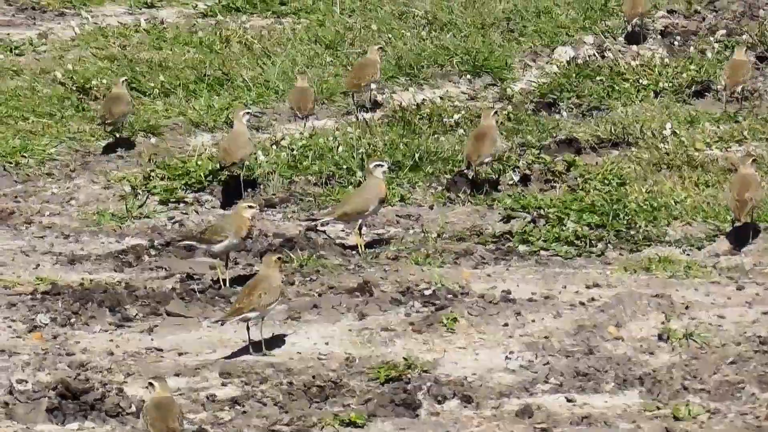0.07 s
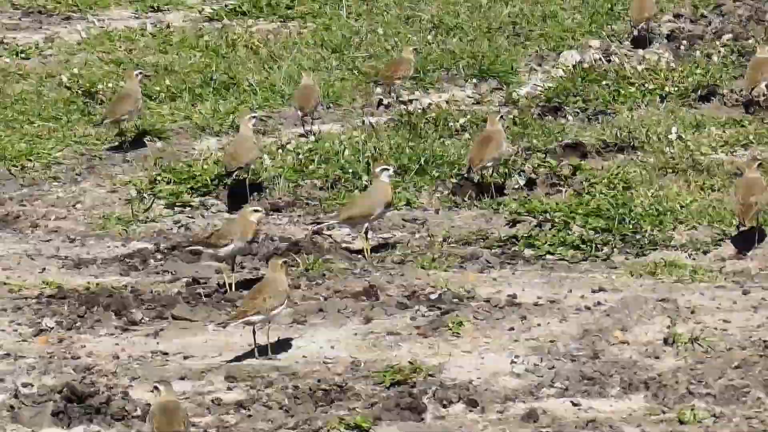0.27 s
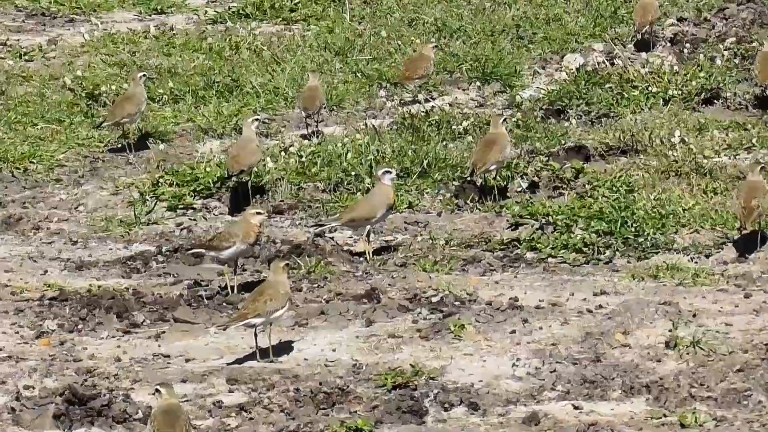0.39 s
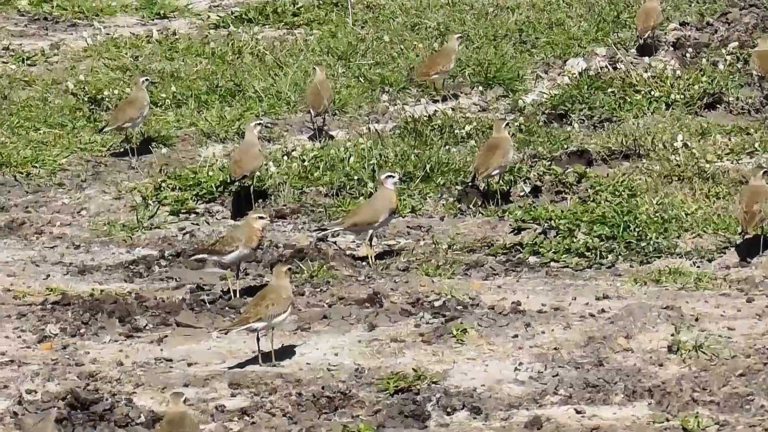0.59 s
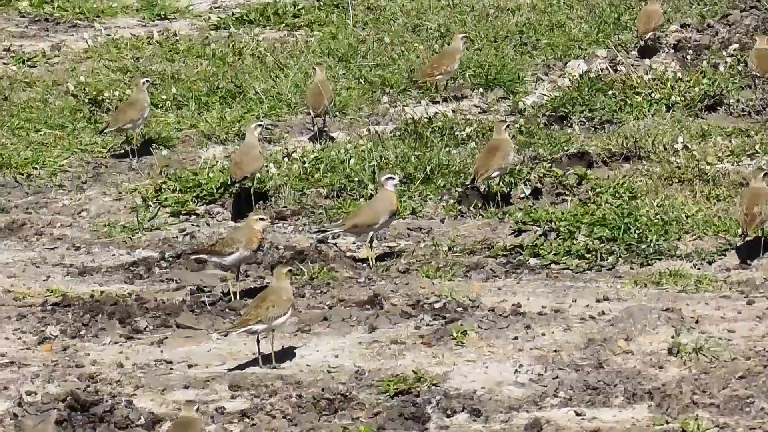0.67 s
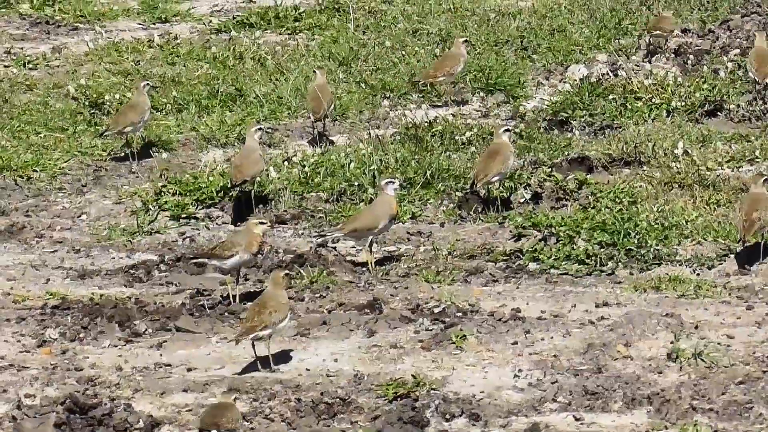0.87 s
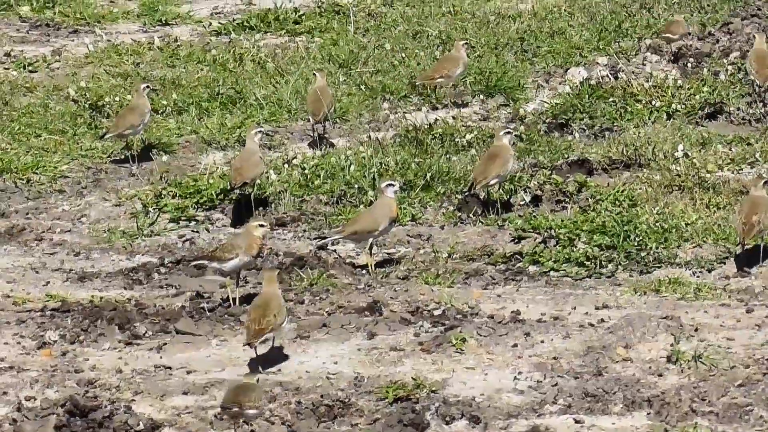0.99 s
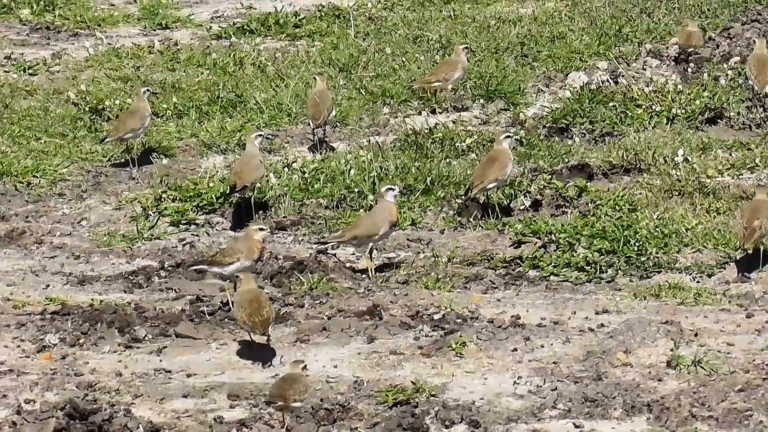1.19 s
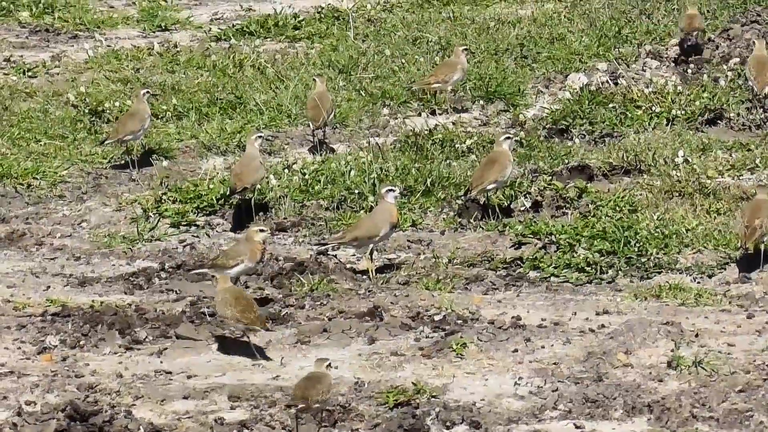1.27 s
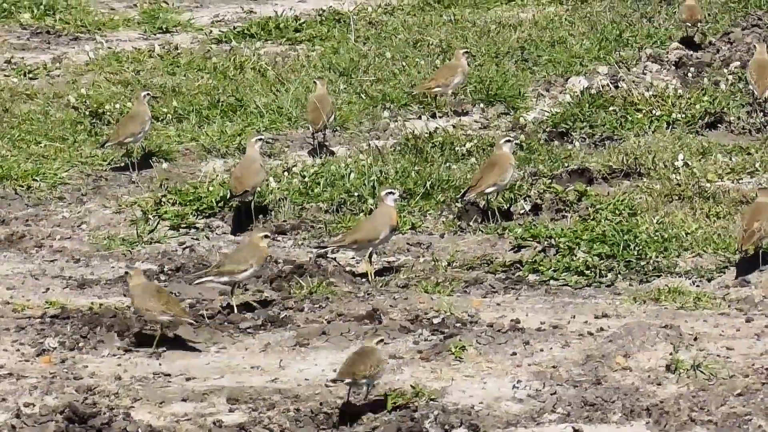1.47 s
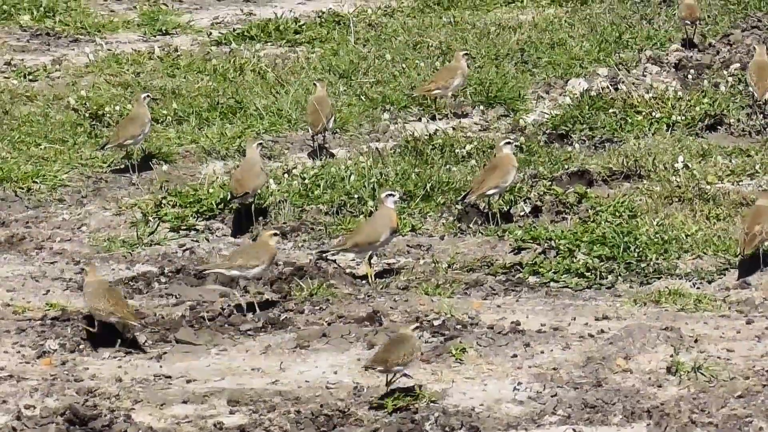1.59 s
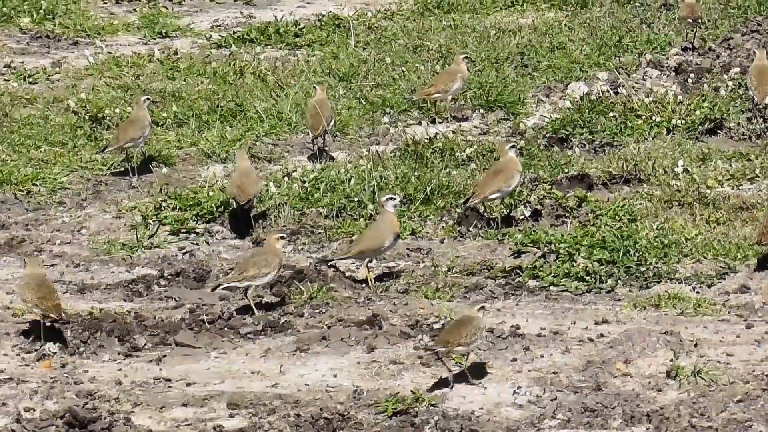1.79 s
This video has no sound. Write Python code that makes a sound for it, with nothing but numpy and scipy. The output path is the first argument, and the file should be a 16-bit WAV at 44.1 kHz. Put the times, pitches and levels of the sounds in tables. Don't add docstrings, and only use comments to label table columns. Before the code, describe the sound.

Small wading bird gives a loud sharp warbled chip, then a fainter echoing one answers outdoors

```python
import sys
import numpy as np
from scipy import signal
from scipy.fft import rfft, irfft, next_fast_len
from scipy.io import wavfile
from scipy.ndimage import uniform_filter1d, map_coordinates

SR = 44100
rng = np.random.default_rng(int(sys.argv[2]) if len(sys.argv) > 2 else 0)


def generate_wav(signal):
    frames = np.transpose(np.atleast_2d(signal))
    scaled = np.clip(frames, -1, 1) * 32767
    pcm = np.round(scaled).astype(np.int16)
    wavfile.write(sys.argv[1], SR, pcm)


def convert_level_to_amplitude(level_db):
    exponent = np.asarray(level_db, float) / 20
    return 10 ** exponent


N = 79380

# freq_hz, level_db
PORT_COLOUR = [(4500, -2), (5050, 7.5), (6350, 8), (7400, -8), (8700, 9.5), (11000, 11), (13000, 7.5),
               (16000, -4)]


def unit(x):
    return x / np.sqrt(np.mean(x ** 2) + 1e-20)


def along(points, hz):
    f, v = np.transpose(points)
    return np.interp(np.log(hz + 1), np.log(f + 1), v)


def wobble(rate_hz):
    knots = rng.standard_normal(int(N * rate_hz / SR) + 4)
    return map_coordinates(knots, [np.arange(N) * rate_hz / SR])


def filtered(x, response):
    m = next_fast_len(N + SR // 2)
    return irfft(rfft(x, m) * response(np.fft.rfftfreq(m, 1 / SR)), m)[..., :N]


def add(track, start_s, sound):
    part = track[round(start_s * SR):][:len(sound)]
    part += sound[:len(part)]


def ports(x, direction):
    side_hz, width_hz, side_db, turn_rad = 7040, 1170, 22.5, .4

    def response(f):
        resonance = width_hz * f / (side_hz ** 2 - f * f + 1j * f * width_hz)
        side = direction * np.exp(-1j * turn_rad) * convert_level_to_amplitude(side_db) * resonance
        return convert_level_to_amplitude(along([(3000, 0.0093)] + PORT_COLOUR, f)) + side * [[1], [-1]]

    return filtered(x, response)


def diffuse(pair):
    # freq_hz, left_right_likeness
    likeness = [(40, 0.25), (100, 1), (300, 0.787), (1000, 0.808), (4000, 0.98), (7300, 0.42),
                (9000, 0.664), (15000, 0.94)]

    def response(f):
        turn_rad = np.arccos(np.clip(along(likeness, f), -1, 1)) / 2
        colour = convert_level_to_amplitude(along([(3000, 0)] + PORT_COLOUR, f))
        return colour * [np.cos(turn_rad), np.sin(turn_rad)]

    mid, side = filtered(pair, response)
    return np.array([mid + side, mid - side])


def echoes(x):
    near_t60_s, far_db, gap_s, grain_db, grains_per_s = 0.1, 2.5, .002, 3, 450
    # freq_hz, t60_s
    far_decay = [(500, 0.9), (5000, 0.57), (12000, 0.302)]
    hz, t, z = signal.stft(rng.standard_normal((2, SR // 2)), SR, nperseg=128)
    near = convert_level_to_amplitude(-60 * t / near_t60_s)
    far = convert_level_to_amplitude(far_db - 12.5 - 60 * t / along(far_decay, hz)[:, None])
    tail = signal.istft(z * (near + far), SR, nperseg=128)[1]
    tail = tail * convert_level_to_amplitude(grain_db * wobble(grains_per_s)[:tail.shape[1]])
    late = np.pad(x, (round(gap_s * SR), 0))[None]
    return diffuse(signal.fftconvolve(late, tail / np.linalg.norm(tail[0]), axes=1)[:, :N])


def air():
    level_db, split_hz = -51, 140
    # freq_hz, level_db_per_hz
    hush = [(25, -13.5), (60, -7.5), (130, -0.5), (250, -1), (500, -5), (900, -7.5), (2000, -15.5),
            (16000, -26)]
    # time_s, strength_db
    breeze = [
        (0.0, -55),
        (0.314, -53.5),
        (0.436, -56.5),
        (0.916, -57.5),
        (1.518, -54.5),
        (1.638, -56.5),
        (1.8, -52.5),
    ]
    z = signal.stft(rng.standard_normal((2, N)), nperseg=512)[2]
    patches = uniform_filter1d(rng.standard_normal(z.shape[1:]), 6, 0)
    patches = uniform_filter1d(patches, 8, 1)
    steady = signal.istft(z * convert_level_to_amplitude(1.45 * unit(patches)), nperseg=512)[1][:, :N]
    breeze_db = np.interp(np.arange(N) / SR, *np.transpose(breeze))
    rustle_db = 0.61 * wobble(5.4) + 2.0 * wobble(59.7)
    swell = convert_level_to_amplitude(0.93 * (breeze_db - breeze_db.mean()) + rustle_db)
    rumble = filtered(steady, lambda f: f < split_hz)
    pair = rumble + filtered(steady * swell, lambda f: f >= split_hz)
    return convert_level_to_amplitude(level_db) * diffuse(unit(filtered(pair, lambda f: convert_level_to_amplitude(along(hush, f)))))


def whistles():
    flutter_db, waver_ratio, port_boost_ease, echo_db = 2.6, .012, .65, -6.5
    # start_s, length_s, from_hz, to_hz, level_db
    slides = [(.001, 0.0109, 4640, 5403, -44), (.022, 0.0069, 5190, 5300, -42.5),
              (.032, 0.0127, 4500, 4775, -52), (.095, 0.011, 4050, 5350, -48),
              (.23, .014, 1786, 1550, -45.5), (.298, 0.028, 2923, 3480, -53),
              (.342, 0.074, 4572, 2890, -48.5), (.645, 0.01, 6100, 5810, -50.5),
              (.698, .018, 5300, 3790, -43.5), (.719, .017, 3453, 2885, -36),
              (.749, 0.013, 2020, 1630, -52), (.786, 0.0097, 2370, 2304, -45.5),
              (1.443, 0.08, 4274, 2750, -54), (1.522, 0.0093, 5230, 5373, -47),
              (1.59, 0.081, 3472, 4041, -54.5), (1.699, 0.018, 4300, 3640, -48),
              (1.723, 0.0163, 5550, 4910, -42), (1.762, 0.0129, 8260, 8330, -45),
              (1.099, 0.0075, 2470, 2860, -51.5), (1.405, 0.026, 2670, 3520, -57.5)]
    # start_s, length_s, from_hz, to_hz, level_db
    glides = [(.642, 0.0148, 4870, 3530, -48), (.671, 0.015, 2780, 3540, -42.5),
              (.685, 0.0076, 3830, 3880, -36.5), (.705, 0.0083, 4860, 4180, -41),
              (.657, 0.01, 4760, 4650, -49), (.758, 0.02, 3212, 2950, -50), (.757, .022, 3790, 4020, -51),
              (.801, .011, 5318, 6200, -53), (.013, 0.0094, 4120, 4940, -49), (.044, .007, 4800, 4200, -52),
              (.078, .006, 5250, 5150, -60), (.082, .007, 4330, 4080, -51.5),
              (.088, 0.0072, 5250, 5250, -52), (.105, 0.0259, 5310, 5440, -50),
              (.163, .008, 3750, 2400, -49), (1.05, 0.037, 4223, 2314, -47.5),
              (1.221, 0.0081, 4120, 3885, -55), (1.512, 0.041, 2776, 2590, -54.5),
              (1.535, 0.0114, 2850, 3400, -55), (1.556, 0.026, 2330, 2517, -57),
              (1.661, 0.0079, 5720, 6690, -39), (1.667, 0.02, 8300, 8100, -55),
              (1.688, .012, 6700, 4246, -47), (1.7185, 0.0045, 6435, 5630, -26),
              (1.756, 0.0041, 5630, 6700, -28), (1.556, .026, 5900, 5900, -57),
              (1.784, .01, 6660, 5500, -54), (.2358, 0.0046, 4110, 3510, -30.5),
              (1.1205, 0.0047, 4400, 3700, -39.5)]
    # start_s, length_s, from_hz, to_hz, level_db
    bends = [(.133, .031, 5400, 3950, -49), (.41, .024, 2950, 3570, -50), (.689, 0.009, 3500, 2600, -47),
             (.053, 0.025, 4300, 4620, -50), (.83, .025, 4100, 2830, -58.5), (1.106, .023, 2880, 2380, -48),
             (1.233, 0.034, 3750, 2387, -54), (1.55, 0.03, 2620, 3120, -53),
             (1.643, 0.0127, 5746, 6600, -49), (.736, .013, 2900, 2350, -44),
             (1.742, 0.035, 5020, 4860, -49), (.445, 0.0171, 2610, 2613, -55),
             (.715, .007, 3850, 3550, -41)]
    shapes = ((slides, lambda u: 1 - (1 - u) ** 1.9), (glides, lambda u: u), (bends, lambda u: u ** 2.0))
    dry, waver, flutter = np.zeros(N), wobble(300), wobble(150)
    for rows, curve in shapes:
        for start_s, length_s, from_hz, to_hz, level_db in rows:
            u = np.linspace(0, 1, round(length_s * SR))
            hz = from_hz + (to_hz - from_hz) * curve(u)
            hz = hz * (1 + waver_ratio * waver[round(start_s * SR):][:len(u)])
            port_db = along([(3000, 0.014)] + PORT_COLOUR, hz)
            tone_db = level_db - port_boost_ease * np.clip(port_db, 0, None)
            tone = np.sin(2 * np.pi * np.cumsum(hz) / SR)
            add(dry, start_s, convert_level_to_amplitude(tone_db) * np.sin(np.pi * u) ** 0.4 * tone)
    dry = dry * convert_level_to_amplitude(flutter_db * flutter)
    return ports(dry, 0.053) + convert_level_to_amplitude(echo_db) * echoes(dry)


def footfalls():
    # start_s, peak_db
    ticks = [(0.102, -33), (0.5848, -33.5), (0.6698, -34), (0.7288, -29), (0.7998, -29.5), (0.8313, -34),
             (0.837, -36), (0.894, -44), (1.008, -39), (1.036, -36), (1.052, -41), (1.7432, -27.5)]
    # start_s, peak_db, pitch_hz
    taps = [(0.0942, -43, 925), (0.7061, -40.5, 1860), (0.7283, -38.5, 870), (0.7931, -36.5, 920),
            (0.8335, -42, 990), (0.855, -44.5, 1000), (0.9926, -37, 1200), (1.0896, -37.5, 1210),
            (1.4287, -40, 1130), (1.6209, -44, 820), (0.965, -51, 890), (0.108, -43, 2280),
            (0.816, -38.5, 1700), (1.6564, -39, 1087), (1.7429, -37.5, 1640)]
    # start_s, peak_db, pitch_hz
    thumps = [
        (0.004, -43.5, 221),
        (0.537, -40, 240.7),
        (0.737, -46, 280),
        (0.793, -50.5, 274),
        (1.303, -49, 212),
        (1.431, -40, 194),
        (1.584, -41.5, 193.4),
        (1.593, -39, 210),
        (1.741, -44.5, 241),
    ]
    dry, t = np.zeros(N), np.arange(SR // 20) / SR
    for start_s, peak_db in ticks:
        add(dry, start_s, convert_level_to_amplitude(peak_db - 6.5 - 60 * t / 0.006) * rng.standard_normal(len(t)))
    dry = filtered(dry, lambda f: f ** 2 / (f ** 2 + 6500 ** 2))
    for rows, t60_cycles, lift_db in ((taps, 4, 9), (thumps, 7, 6)):
        for start_s, peak_db, hz in rows:
            decay = convert_level_to_amplitude(peak_db + lift_db - 60 * t * hz / t60_cycles)
            add(dry, start_s, decay * np.sin(2 * np.pi * hz * t))
    dry = filtered(dry, lambda f: f ** 4 / (f ** 4 + 130 ** 4))
    return ports(dry, 0.21) + convert_level_to_amplitude(-5.5) * echoes(dry)


def dove():
    purr_hz, purr_swing_hz, purr_depth = 30, 75, .92
    # start_s, length_s, pitch_hz, level_db
    coos = [
        (0.03, 0.075, 863, -43.5),
        (.105, 0.11, 829, -52),
        (0.215, 0.2144, 845, -44.5),
        (1.206, 0.047, 887, -48.5),
        (1.249, 0.032, 716, -45.5),
        (1.272, 0.051, 860.2, -45),
        (1.426, 0.049, 758, -46),
        (1.471, 0.041, 853, -46),
        (1.61, .19, 862, -46.5),
    ]
    dry, uneven, drift = np.zeros(N), wobble(27.06), wobble(20)
    for start_s, length_s, pitch_hz, level_db in coos:
        t = np.arange(round(length_s * SR)) / SR
        beat = 2 * np.pi * purr_hz * t
        hz = pitch_hz + purr_swing_hz * np.sin(beat) + 20 * drift[round(start_s * SR):][:len(t)]
        throb = 1 - purr_depth * np.cos(beat / 2) ** 2
        swell = np.sin(np.pi * t / length_s) ** 0.089
        add(dry, start_s, convert_level_to_amplitude(level_db) * throb * swell * np.sin(2 * np.pi * np.cumsum(hz) / SR))
    dry = dry * convert_level_to_amplitude(1.22 * uneven)
    return dry * convert_level_to_amplitude([[.8], [-.8]]) + convert_level_to_amplitude(-6) * echoes(dry)


def chips():
    base_hz, sag_hz, sag_s, far_start_hz = 5680, 480, .0075, 302.5
    length_s, rise_s, release_s = .056, .0045, 0.0038
    waver_ratio, flutter_db, rasp_db = .032, 3, -21.5
    octave_level_db, octave_swing, far_dull = -16.5, 1.2, 0.75
    # start_s, level_db, echo_db, tempo, direction (-1..1)
    calls = [
        (0.2293, -17, -8.5, 1.0, 0.29),
        (1.1131, -31, 3.5, .93, 0.25),
    ]
    # after_start_s, leap_hz, rise_s, fall_s, level_db at the top
    leaps = [
        (.0088, -600, .0028, .0032, -13),
        (.0157, 2950, .003, .0042, -13),
        (.0268, 3150, .003, .0055, -9),
        (.0366, 1400, .0024, .017, -5),
    ]
    # after_start_s, level_db
    effort = [(0, 0), (.005, 3.5), (.012, 0), (.021, -3), (.027, -5), (.033, 0), (.04, -6), (.048, -11),
              (.056, -14)]
    out = 0
    for start_s, level_db, echo_db, tempo, direction in calls:
        t = np.arange(round(length_s * tempo * SR)) / SR / tempo
        n = len(t)
        rough = np.clip((t - .008) / 0.0081, 0, 1)
        onset = np.clip(t / rise_s, 0, 1)
        extra_hz = far_start_hz * (tempo < .97)
        hz = base_hz - sag_hz + (sag_hz + extra_hz) * np.exp(-(t / sag_s) ** 2)
        fade_db = np.interp(t, *np.transpose(effort)) + flutter_db * rough * wobble(492)[:n]
        dip_db = 0
        for top_s, leap_hz, up_s, down_s, top_db in leaps:
            away = np.where(t < top_s, (t - top_s) / up_s, (t - top_s) / down_s)
            bump = np.cos(np.pi / 2 * np.clip(away, -1, 1)) ** 2
            hz = hz + leap_hz * bump
            dip_db = dip_db + top_db * bump
        phase = 2 * np.pi * np.cumsum(hz * (1 + waver_ratio * rough * wobble(711)[:n])) / SR
        octave_db = octave_level_db - far_dull * (echo_db + 9)
        octave_db = octave_db + dip_db * np.where(hz < base_hz - sag_hz, octave_swing, .15)
        octave_db = octave_db + 0.84 * flutter_db * wobble(525)[:n]
        tone = convert_level_to_amplitude(dip_db) * np.sin(phase)
        octave = convert_level_to_amplitude(octave_db) * onset * np.sin(2 * phase)
        rasp = convert_level_to_amplitude(rasp_db) * (0.363 + rough) * rng.standard_normal(n)
        envelope = convert_level_to_amplitude(level_db + fade_db) * onset ** 1.33 * np.clip((length_s - t) / release_s, 0, 1)
        dry = np.zeros(N)
        add(dry, start_s, envelope * (tone + octave + rasp))
        dry = filtered(dry, lambda f: f ** 2 / (f ** 2 + 1200 ** 2))
        out = out + ports(dry, direction) + convert_level_to_amplitude(echo_db) * echoes(dry)
    return out


def scene():
    return air() + whistles() + footfalls() + dove() + chips()


def roll_off(x):
    return signal.sosfilt(signal.butter(12, 16360, fs=SR, output="sos"), x)


def record(dry):
    mix = filtered(dry, lambda f: f < 16330)
    return roll_off(mix)


dry = scene()
out = record(dry)
generate_wav(out)
```